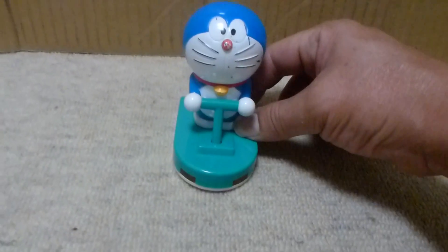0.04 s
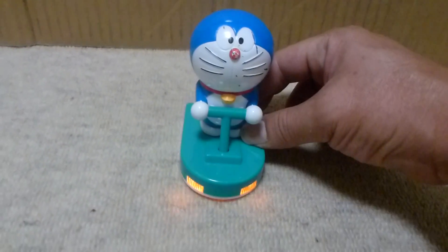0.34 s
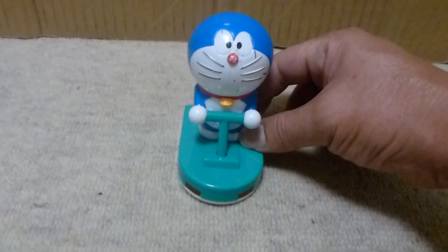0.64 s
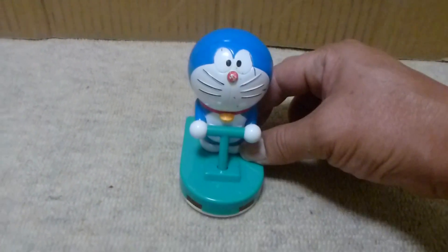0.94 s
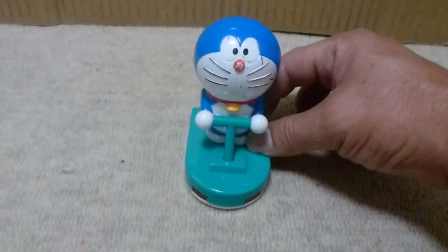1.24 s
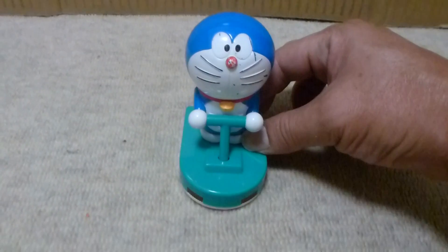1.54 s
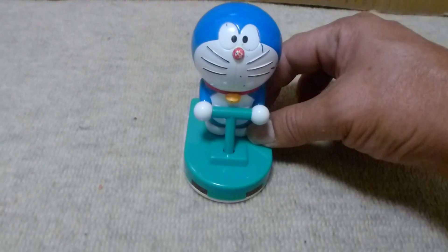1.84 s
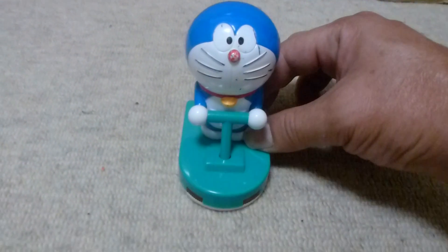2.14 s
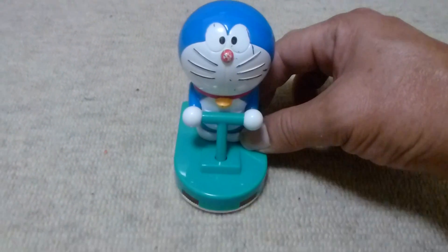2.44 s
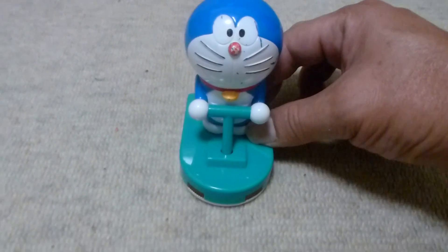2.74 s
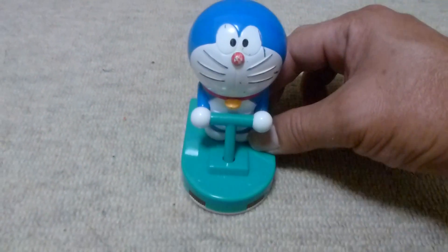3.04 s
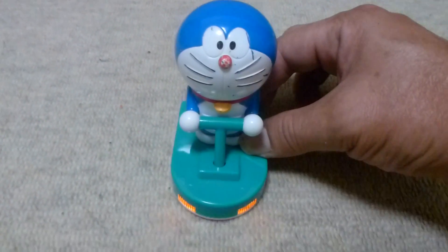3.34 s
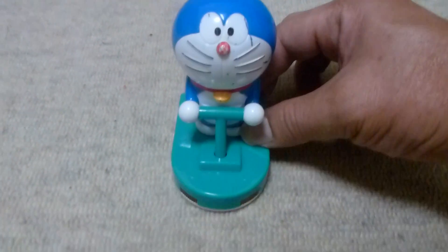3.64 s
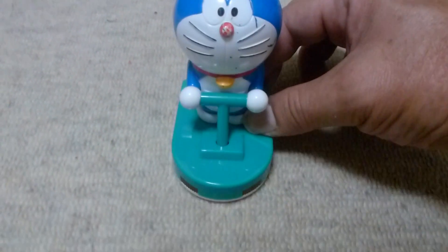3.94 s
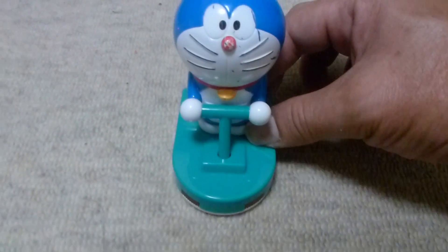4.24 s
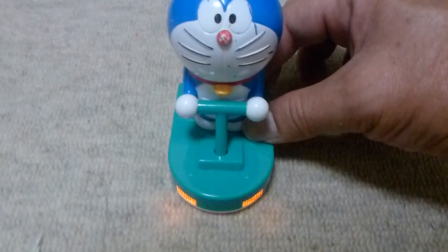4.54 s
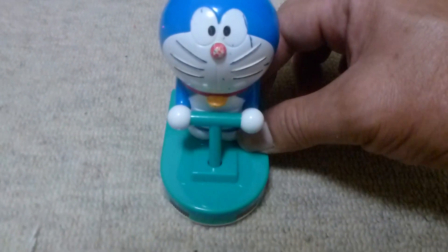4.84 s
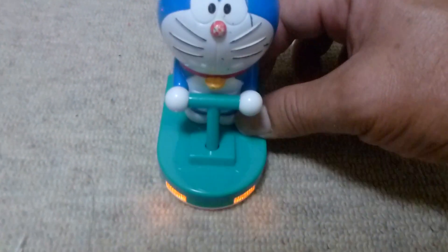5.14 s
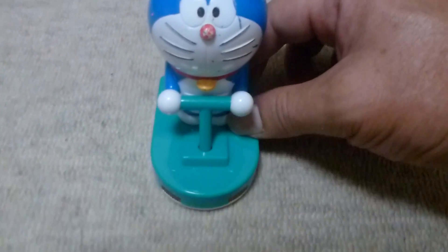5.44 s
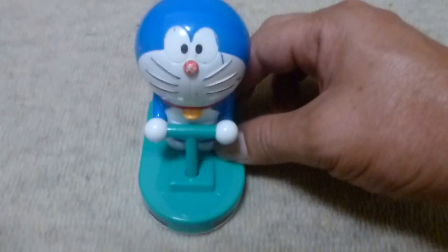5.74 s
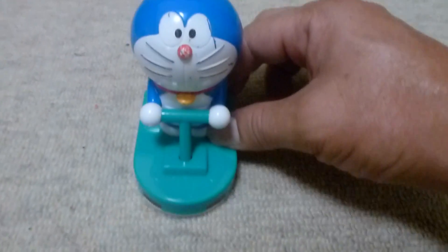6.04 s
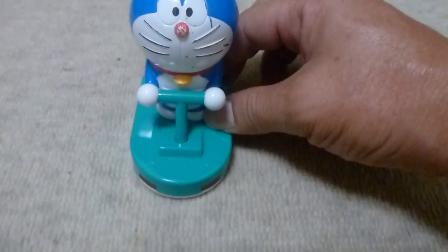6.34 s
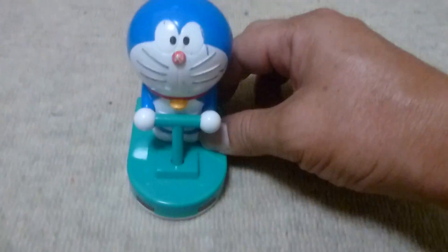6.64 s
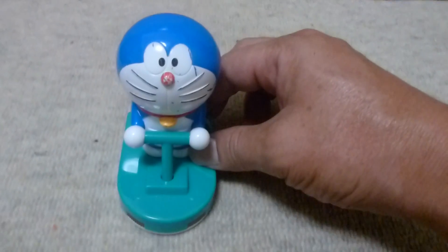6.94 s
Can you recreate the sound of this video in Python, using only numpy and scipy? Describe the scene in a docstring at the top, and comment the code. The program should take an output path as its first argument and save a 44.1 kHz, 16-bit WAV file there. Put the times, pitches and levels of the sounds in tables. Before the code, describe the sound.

A small plastic toy is pushed to and fro over cloth. Its dry axle gives brief, high chirps with gaps between them, joined by a few light plastic ticks and soft, dull bumps. Later the chirps become a stuttering, wavering squeal that falls in pitch, turns raspy and fainter, then climbs again. The toy is close to the microphone in a small room with a faint fan-like hum and hiss.

```python
"""The dry axle of a small plastic toy sticks and slips as the toy is pushed to and fro over cloth.
It gives short chirps at first, then a falling, wavering squeal that breaks up into rasps.
Loose parts of the shell tick, the cloth cushions pushes into dull bumps, and the wheels rustle.
The toy is close up in a small room, over a bed of fan-like hum and hiss."""
import sys
import numpy as np
from scipy import signal
from scipy.fft import rfft, irfft, next_fast_len
from scipy.io import wavfile
from scipy.ndimage import map_coordinates

SR = 44100
rng = np.random.default_rng(int(sys.argv[2]) if len(sys.argv) > 2 else 0)


def transcribe(u):
    """Save the signal u as a 16-bit wav file named by the first command-line argument.

    u: samples, shape (n,) or (channels, n), limited to [-1, 1]; the rate is SR.
    q: integer samples, one column per channel.
    """
    v = np.clip(np.atleast_2d(u).T, -1, 1)
    q = np.round(v * 32767).astype(np.int16)
    wavfile.write(sys.argv[1], SR, q)


N = 316638

# Axle chirps, one or a few to a push: (time [s], length [s], start pitch [Hz], middle pitch [Hz],
# end pitch [Hz], level [dB], 2nd harmonic boost [dB], left over right [dB])
AXLE_CHIRPS = [(0.092, 0.018, 4550, 4546, 4500, -22, -10, 2), (1.114, 0.019, 4580, 4510, 4470, -22, 4, 1),
               (1.479, 0.028, 4730, 4785, 4810, -16.5, -0.5, 3),
               (2.06, 0.071, 4460, 4365, 4410, -21, 6, -.5),
               (2.449, 0.026, 4540, 4515, 4445, -24.5, 3.5, 3),
               (2.475, 0.024, 4540, 4650, 4465, -21.5, 1, .5),
               (2.892, 0.029, 4790, 4810, 4780, -48.5, -5, 2),
               (3.115, .02, 4540, 4480, 4560, -39.5, -10, -2),
               (3.135, 0.051, 4510, 4530, 4380, -23.5, 7, -2.5), (3.195, .027, 4490, 4454, 4460, -24, 4, 0),
               (3.226, 0.022, 4450, 4455, 4435, -32.5, -12, -1),
               (3.624, 0.031, 4160, 3980, 4180, -34, -1, 2),
               (4.031, 0.0296, 4370, 4374, 4525, -18.5, 3, 1.5),
               (4.198, 0.0326, 4130, 3740, 3910, -23, 4.5, 2), (4.227, .035, 4000, 3780, 3755, -23, 4, 0),
               (4.276, 0.032, 4385, 4513, 4310, -17.5, 10.5, 1.5),
               (4.524, 0.017, 4550, 4490, 4460, -49, -8, 0),
               (4.691, 0.022, 4710, 4670, 4670, -17.5, 8.5, 3.5)]
# The axle catches, squeals and lets go; roughness runs from 0 (pure) to a cap of 1 (rasp):
# (time [s], length [s], level [dB], start roughness [-], end roughness [-])
SQUEAL_CATCHES = [(5.028, .029, -27, 0.05, 0.05), (5.075, 0.065, -23.5, 0.04, 0.26),
                  (5.144, 0.013, -21, 0.07, 0), (5.183, 0.0086, -30.5, 0.22, .12),
                  (5.207, 0.011, -31.5, 0, .05), (5.238, 0.022, -28.5, .03, 0.1),
                  (5.267, .023, -25, 0.01, 0.09), (5.294, 0.055, -28.5, .16, 0.14),
                  (5.349, .023, -33.5, .1, 0.04), (5.371, 0.042, -23.5, .12, .03),
                  (5.466, 0.054, -23.5, 0.03, 0.53), (5.529, 0.012, -27, 0.14, 0),
                  (5.595, 0.022, -25.5, 0.15, 0.17), (5.626, 0.017, -27.5, .37, 0.35),
                  (5.694, 0.068, -26.5, 0.09, 0.63), (5.77, 0.024, -28.5, 0.21, 0.67),
                  (5.83, 0.019, -35, 0.3, 0.36), (5.987, .017, -32, .48, 0.56),
                  (6.014, .016, -34, 0.26, 0.25), (6.05, .09, -34, 0.36, 0.44),
                  (6.193, 0.027, -44, 0.93, 1.1), (6.24, 0.0098, -44.5, .95, 1),
                  (6.356, 0.048, -36.5, 0.76, 0.56), (6.403, 0.039, -34.5, 0.3, 0.32),
                  (6.459, .05, -39.5, 0.74, 0.56), (6.524, 0.064, -43.5, 0.76, 0.4),
                  (6.587, .018, -39, 1.03, 1.1), (6.612, 0.041, -46, .6, .55),
                  (6.671, 0.1, -35.5, 0.67, 0.22), (6.784, 0.018, -29, 0.19, 0.34),
                  (6.946, .016, -38, 0.21, 0.1), (6.997, .012, -40.5, .12, 0.22)]
# The squeal's wavering opening: (time [s], pitch [Hz])
SQUEAL_WAVER = [(5.03, 3620), (5.11, 3495), (5.124, 3200), (5.138, 3460), (5.152, 3135), (5.188, 3484),
                (5.194, 3450), (5.21, 3121), (5.256, 3094), (5.278, 2888), (5.322, 3230), (5.338, 3556),
                (5.36, 3160), (5.384, 3320), (5.396, 3130), (5.415, 3270)]
# Its dive into the rasp and its climb back: (time [s], pitch [Hz])
SQUEAL_DIVE = [(5.468, 2902), (5.64, 2851), (5.70, 2915), (5.724, 3210), (5.743, 2895), (5.99, 2820),
               (6.05, 2186), (6.14, 2264), (6.2, 1904), (6.38, 2076), (6.418, 1962), (6.44, 2270),
               (6.48, 1996), (6.54, 1830), (6.64, 1770), (6.70, 2130), (6.75, 2166), (6.81, 2614),
               (7.0, 2850)]
# The squeal's pan follows its pitch: (pitch [Hz], left over right [dB])
SQUEAL_PAN = [(2100, 1), (2900, 0), (3130, 2.5), (3400, -5.5), (3650, 0)]
# How strongly the shell radiates the axle's harmonics: (frequency [Hz], gain [dB])
SHELL_EQ = [(1750, -2), (2200, -11), (2500, 1.5), (2900, 3.5), (3150, -11.5), (3450, -1), (3950, 13),
            (4550, 4), (5050, 4.5), (5750, 16), (6350, 11.5), (7400, 1.5), (8800, 5), (9700, -1.5),
            (11500, 5), (13300, -3), (14500, -10)]
# The shell's colour under stray slips: (frequency [Hz], gain [dB])
RASP_EQ = [(1200, -9), (1900, -4.5), (2700, 9), (4200, 8.5), (6000, 1.5), (7500, -9.5), (12000, -12),
           (16000, -21)]
# Ticks of the shell: (time [s], relative level [dB], knock trim [dB])
SHELL_TICKS = [(0.5285, -22, -2), (0.748, -31.5, -4), (0.868, -21.5, -24), (0.897, -33, 5),
               (0.9618, -34, -11), (0.9729, -32.5, 8.5), (3.977, -26, -1), (6.1995, -32, -14),
               (6.9314, -37, -25)]
# The shell's colour under a tick: (frequency [Hz], gain [dB])
CLICK_EQ = [(300, -9), (900, 8), (1700, 0.5), (3300, -3), (5000, 1), (8000, -11), (11000, -8.5),
            (15000, -18)]
# Bumps on the cloth: (centre time [s], half length [s], start pitch [Hz], end pitch [Hz], level [dB])
CLOTH_BUMPS = [(1.58, 0.046, 191, 200, -40.5), (1.63, .06, 298, 172, -38), (2.25, 0.054, 332, 119.5, -42),
               (2.31, 0.094, 64, 56, -57), (5.765, 0.042, 192, 142, -44), (5.8, 0.081, 61.5, 56.5, -53),
               (6.25, 0.036, 173, 140, -44)]
# Rustle of the weave: (frequency [Hz], gain [dB])
CLOTH_EQ = [(150, -44), (350, -3), (600, 6), (1200, -0.5), (2200, -6), (6000, -15.5), (15000, -24)]
# Low body of the fan-like drone: (frequency [Hz], gain [dB])
DRONE_EQ = [(25, -54), (42, -24), (58, -18), (85, -8.5), (105, -28), (125, 0.5), (165, 0), (215, -1.5),
            (330, 0), (390, -2.5), (460, -14.5), (700, -37)]
# Tones in the drone: (frequency [Hz], relative level [dB])
HUM_TONES = [(59.2, -69.5), (118.4, -56), (258.4, -55.5), (355.3, -52), (532.9, -61.5), (602.9, -74.5),
             (829.0, -61.5), (1109, -61)]
# Airy rush of the room: (frequency [Hz], gain [dB])
AIR_EQ = [(180, -61), (300, -4.5), (360, -3.5), (405, -14.5), (478, -4.5), (574, -14.5), (1080, -11.5),
          (1900, -20), (4090, -20), (4520, -23), (5250, -22.5), (11500, -29.5), (16000, -39)]
# Narrow bands of hiss: (centre [Hz], width [Hz], relative level [dB])
HISS_BANDS = [(4960, 320, -69), (5650, 260, -66), (11290, 240, -67.5)]
# Stereo image of the noise beds: (frequency [Hz], left-right correlation [-])
STEREO_LIKENESS = [(60, 0.45), (130, 0.92), (290, 0.93), (640, 0.49), (1410, 0.12), (3100, 0.026),
                   (6820, 0.36), (15000, 0.09)]
# Decay of the room's tail: (frequency [Hz], time to fall 60 dB [s])
ROOM_DECAY = [(300, 0.13), (3000, 0.31), (5000, 0.24), (9000, 0.16), (15000, 0.023)]

MARGIN_S = 0.04  # space on both sides of a squeak for its lead-in and ring-out


def axle(rasp_db=-0.5):
    """The dry axle sings, and its stray slips rattle the shell."""
    tracks = np.zeros((3, N))
    for start, squeak in [*chirps(), *squeal()]:
        for track, part in zip(tracks, squeak):
            add(track, start - MARGIN_S, part)
    left, right, slips = tracks
    return np.array([left, right]) + amp(rasp_db) * resonate(slips, RASP_EQ)


def chirps(free_hz=4260, base_rough=0.041, rough_per_khz=0.3):
    """Light pushes: brief, nearly pure glides that roughen when forced below the axle's free pitch."""
    for start, length, start_hz, middle_hz, end_hz, db, second_db, pan_db in AXLE_CHIRPS:
        t = squeak_time(length)
        hz = np.interp(t, [0, length / 2, length], [start_hz, middle_hz, end_hz])
        rough = base_rough + rough_per_khz * np.maximum(free_hz - hz, 0) / 1000
        yield start, stick_slip(t, length, hz, db, rough, pan_db, second_db)


def squeal(rough_curve=1.76):
    """Longer pushes: catches ride one pitch line; in each, the grip holds, then breaks up or settles."""
    times, pitches = np.vstack([SQUEAL_WAVER, SQUEAL_DIVE]).T
    for start, length, db, start_rough, end_rough in SQUEAL_CATCHES:
        t = squeak_time(length)
        hz = np.interp(start + t, times, pitches)
        rough = start_rough + (end_rough - start_rough) * np.clip(t / length, 0, 1) ** rough_curve
        yield start, stick_slip(t, length, hz, db, rough, along(SQUEAL_PAN, hz))


def stick_slip(t, length, hz, db, rough, pan_db, second_db=0,
               tilt_db_per_octave=-14, calm_rough=0.16, slips_per_s=3200):
    """The axle slips once a cycle: one squeak as rows of left tone, right tone and stray slips."""
    n, rough = len(t), np.clip(rough, 0, 1)
    swell, lock = squeak_envelope(t, length, rough)
    orders = np.arange(1, 5)[:, None]
    source_db = tilt_db_per_octave * np.log2(orders) + second_db * (orders == 2)
    levels = amp(along(SHELL_EQ, orders * hz) + source_db)
    levels /= np.linalg.norm(levels, axis=0)
    # a slightly uneven grip bends the pitch; a very uneven one scatters single cycles
    waver = (0.0028 + 0.0763 * rough) * wobble(219.9, n)
    jitter = 0.087 * rough ** 2 * wobble(1198, n)
    phase = phase_of(hz * (1 + waver + jitter))
    flutter_db = 1.8 * wobble(114, n)
    chatter_db = 6.5 * np.sqrt(rough) * wobble(409.6, n)
    grip = unit(amp(flutter_db + chatter_db))
    # overtones bloom only as the slipping locks in
    harmonics = levels * lock ** ((orders - 1) / 2) * np.sin(orders * phase)
    tone = np.sqrt(2 - rough) * grip * harmonics.sum(axis=0)
    # past the calm range, slips also come at random moments
    slips = (rng.random(n) < slips_per_s / SR) * rng.standard_normal(n)
    stray = np.maximum(rough - calm_rough, 0) * unit(slips)
    return amp(db) * swell * np.array([tone * amp(pan_db / 2), tone * amp(-pan_db / 2), stray])


def squeak_envelope(t, length, rough, lead_s=0.0069, lead_db=-15.5,
                    attack_s=0.0051, release_s=0.0056, sag_db_per_s=16):
    """A clean tone creeps in, locks, slowly weakens while the wheel turns, then rings out."""
    creep = (1 - rough) ** 2 * amp(lead_db) * np.exp(np.minimum(t, 0) / lead_s)
    lock = (1 + np.tanh(2 * t * (1 + rough) / attack_s)) / 2
    release = np.exp(-np.maximum(t - length + release_s / 2, 0) / release_s)
    return np.maximum(creep, lock) * amp(-sag_db_per_s * t) * release, lock


def squeak_time(length):
    """Seconds from a squeak's start, with a margin on both sides."""
    return np.arange(int((length + 2 * MARGIN_S) * SR)) / SR - MARGIN_S


def rubbing(rub_db=-65, ring_hz=4540, width_hz=320, catch_db=6):
    """Below its squeak threshold the axle only rubs, stirring its resonance in faint catches."""
    ring = filtered(rng.standard_normal(N), lambda hz: bell(hz, ring_hz, width_hz))
    return amp(rub_db) * unit(ring * amp(catch_db * wobble(22)))


def ticks(click_db=4, knock_db=-6, knock_hz=750, click_t60=0.0094, knock_t60=0.017):
    """Loose plastic parts touch: a sharp click and a short hollow knock."""
    clicks, knocks = np.zeros((2, N))
    t = np.arange(SR // 20) / SR
    knock = np.sin(2 * np.pi * knock_hz * t) * amp(-60 * t / knock_t60)
    for start, db, trim_db in SHELL_TICKS:
        scrape = 0.3 * rng.standard_normal(len(t)) * amp(-60 * t / click_t60)
        scrape[0] = 1  # one hard contact leads the scrape
        add(clicks, start, amp(db + click_db) * scrape)
        add(knocks, start, amp(db + trim_db + knock_db) * knock)
    return resonate(clicks, CLICK_EQ) + knocks


def bumps(pitch_spread=0.26, lumpy_db=3.5):
    """The cloth cushions pushes into dull rumbles, most of them sinking in pitch."""
    track = np.zeros(N)
    for centre, half_length, start_hz, end_hz, db in CLOTH_BUMPS:
        n = int(2 * half_length * SR)
        hz = np.geomspace(start_hz, end_hz, n) * (1 + pitch_spread * wobble(248, n))
        rumble = unit(np.sin(phase_of(hz)) * amp(lumpy_db * wobble(57, n)))
        add(track, centre - half_length, amp(db) * np.hanning(n) * rumble)
    return track


def rolling(cloth_db=-50, swell_db=0.3, weave_db=2):
    """The wheels rustle over the weave: a quick grain on a slight, slow swell."""
    return amp(cloth_db + swell_db * wobble(2.1) + weave_db * wobble(40)) * noise_bed(CLOTH_EQ)


def drone(drone_db=-46, hum_db=-1, drift_hz=1.192):
    """A fan-like bed: low noise under slightly unsteady tones."""
    hum = sum(amp(db) * np.sqrt(2) * np.sin(phase_of(hz + drift_hz * wobble(6)))
              for hz, db in HUM_TONES)
    return amp(drone_db) * noise_bed(DRONE_EQ) + amp(hum_db) * hum


def air(air_db=-47, whistle_db=-1):
    """Room tone: a broad rush with a few faintly whistling bands of hiss."""
    def bands(hz):
        return sum(amp(db) * np.sqrt(SR / np.pi / width) * bell(hz, centre, width)
                   for centre, width, db in HISS_BANDS)
    hiss = rng.standard_normal((2, N)) + rng.standard_normal(N)  # half wide, half centred
    return amp(air_db) * noise_bed(AIR_EQ) + amp(whistle_db) * filtered(hiss, bands)


def room(x, near_db=-17, near_t60=0.2, tail_db=-14):
    """Close surfaces answer at once, partly alike in both ears; the walls add a short diffuse tail."""
    def reflect(impulse):
        return signal.fftconvolve(x, impulse / np.linalg.norm(impulse[0]), axes=1)[:, :N]
    t = np.arange(SR // 25) / SR
    near = rng.standard_normal(len(t)) + rng.standard_normal((2, len(t)))
    near *= amp(-60 * t / near_t60) * (t > 0.002)
    hz, times, noise = signal.stft(rng.standard_normal((2, SR // 2)), SR, nperseg=256)
    decay = amp(-60 * times / along(ROOM_DECAY, hz)[:, None])
    tail = signal.istft(noise * decay, SR, nperseg=256)[1]
    tail = np.pad(tail, ((0, 0), (SR // 100, 0)))  # 10 ms pre-delay
    return x + amp(near_db) * reflect(near) + amp(tail_db) * reflect(tail)


def noise_bed(eq):
    """Coloured stereo noise of rms 1, nearly mono in the upper bass."""
    def mid_side_gains(hz):
        angle = np.arccos(along(STEREO_LIKENESS, hz)) / 2
        return amp(along(eq, hz)) * [np.cos(angle), np.sin(angle)]
    mid, side = filtered(rng.standard_normal((2, N)), mid_side_gains)
    return unit(np.array([mid + side, mid - side]))


def resonate(x, eq, size=2048):
    """Hits ring a body of the given colour: a minimum-phase filter of unit energy."""
    cepstrum = irfft(np.log(amp(along(eq, np.fft.rfftfreq(size, 1 / SR)))))
    fold = 1 + np.sign(size // 2 - np.arange(size))  # puts all the ringing after the hit
    fold[0] = 1
    ring = irfft(np.exp(rfft(cepstrum * fold)))
    return signal.fftconvolve(x, ring / np.linalg.norm(ring))[:N]


def filtered(x, response):
    """EQ x with a gain that is a function of frequency."""
    size = next_fast_len(N + SR // 4)
    return irfft(rfft(x, size) * response(np.fft.rfftfreq(size, 1 / SR)), size)[..., :N]


def bell(hz, centre, width):
    """Gain of one resonant peak."""
    return 1 / (1 + (2 * (hz - centre) / width) ** 2)


def along(points, hz):
    """Read a curve of (frequency [Hz], value) points on a log axis."""
    freqs, values = np.transpose(points)
    return np.interp(np.log(hz + 1), np.log(freqs + 1), values)


def wobble(rate, size=N):
    """A smooth random curve with rate knots a second."""
    knots = rng.standard_normal(int(size * rate / SR) + 4)
    return map_coordinates(knots, [np.arange(size) * rate / SR])


def phase_of(hz):
    """Running phase of a moving pitch."""
    return 2 * np.pi * np.cumsum(hz) / SR


def add(track, start, sound):
    """Mix a sound into a track, start seconds in."""
    i = max(round(start * SR), 0)
    track[i:i + len(sound)] += sound[:len(track) - i]


def amp(db):
    """Decibels to gain."""
    return 10 ** (np.asarray(db) / 20)


def unit(x):
    """Scale to rms 1."""
    return x / np.sqrt(np.mean(x ** 2) + 1e-20)


def scene(lean_db=0.48):
    """Axle and shell play up front in the room; cloth and background lean a little to the left."""
    toy = room(axle() + rubbing() + ticks())
    bed = bumps() + rolling() + drone() + air()
    return toy + bed * amp([[lean_db], [-lean_db]])


def record(dry, top_hz=15950):
    """A brick-wall high cut on the whole mix."""
    return filtered(dry, lambda hz: hz < top_hz)


dry = scene()
out = record(dry)
transcribe(out)
```